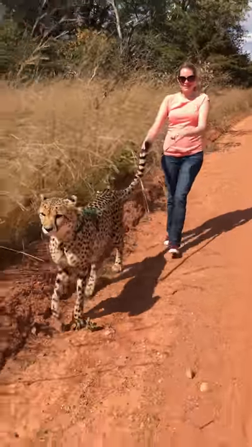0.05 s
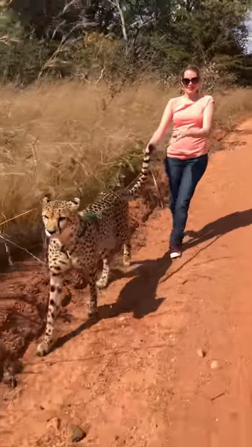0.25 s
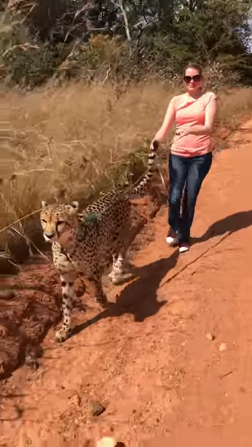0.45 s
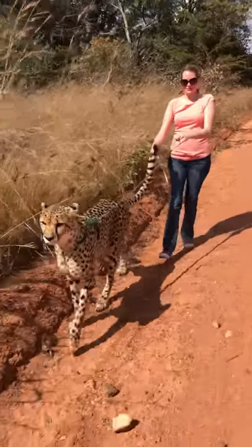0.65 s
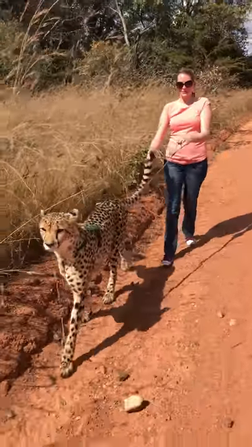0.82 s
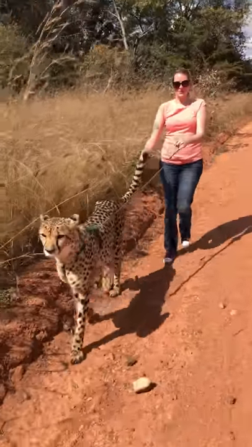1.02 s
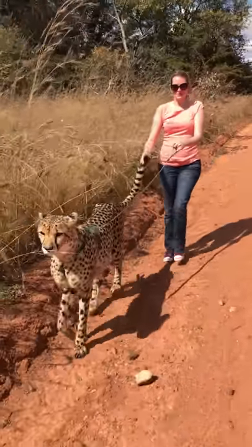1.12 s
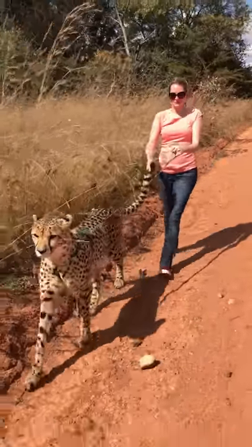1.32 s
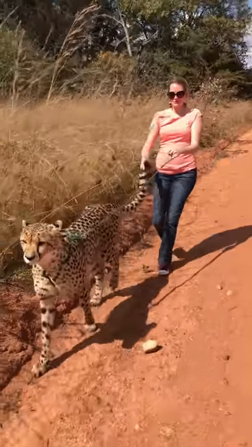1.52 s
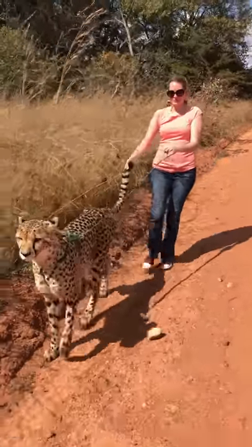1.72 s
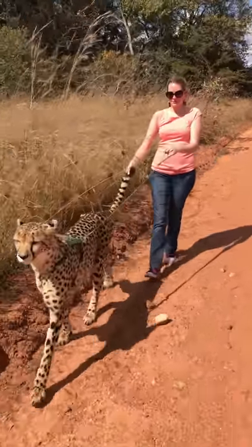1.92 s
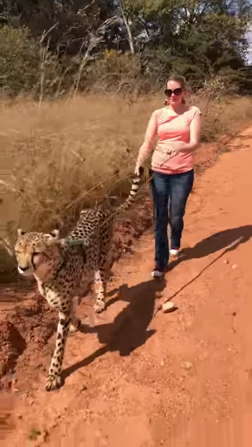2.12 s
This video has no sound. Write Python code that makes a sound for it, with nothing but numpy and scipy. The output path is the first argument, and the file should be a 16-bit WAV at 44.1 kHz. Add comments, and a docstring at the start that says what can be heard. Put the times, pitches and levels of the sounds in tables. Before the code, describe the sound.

Gusts of wind rumble and thump against a microphone carried along a dirt track, strongest in the first second and returning more lightly twice. Soft gritty steps, rustling dry grass and a tiny bird chirp stay far in the background.

```python
"""Wind on the microphone along a dirt track.

Gusts buffet the microphone of a hand-held camera carried along a dry track: each gust is a run
of eddies, single pressure swings, over a low rumble, with a few hard thumps among them.
Behind it soft steps crunch on grit, dry grass swishes and ticks, a small bird chirps faintly
and distant leaves and grass hiss."""
import sys
import numpy as np
from scipy import signal
from scipy.fft import rfft, irfft
from scipy.io import wavfile
from scipy.ndimage import uniform_filter1d

SR = 44100
rng = np.random.default_rng(int(sys.argv[2]) if len(sys.argv) > 2 else 0)


def transcribe(u):
    """Save the signal u as a 16-bit wav file named by the first command-line argument.

    u: samples, shape (n,) or (channels, n), limited to [-1, 1]; the rate is SR.
    q: integer samples, one column per channel.
    """
    v = np.clip(np.atleast_2d(u).T, -1, 1)
    q = np.round(v * 32767).astype(np.int16)
    wavfile.write(sys.argv[1], SR, q)


N = 94815
T = np.arange(N) / SR


def undb(db):
    """The decibel law: 20 dB is a factor of ten in amplitude."""
    return 10 ** (np.asarray(db) / 20)


def unit(x):
    """Normalisation to rms 1."""
    return x / np.sqrt(np.mean(x ** 2) + 1e-20)


def smooth(x, samples):
    """Low-pass filtering by two moving averages in turn."""
    return uniform_filter1d(uniform_filter1d(x, samples), samples)


def colour(x, points):
    """Spectral shaping by (Hz, dB) points, scaled to rms 1."""
    hz, db = np.array(points, float).T
    bins_hz = np.maximum(np.fft.rfftfreq(N, 1 / SR), 1)
    gain = undb(np.interp(np.log(bins_hz), np.log(hz), db))
    return unit(irfft(rfft(x) * gain, N))


def hump(hz, width_oct=1.22):
    """A broad band-pass spectrum around hz, as (Hz, dB) points."""
    octaves = np.linspace(-5, 5, 21)
    offset = (octaves / width_oct) ** 2
    return np.c_[hz * 2 ** octaves, -20 * np.log10(1 + offset + offset ** 2 / 2)]


def curve(points):
    """Gain interpolated between (s, dB) points."""
    return undb(np.interp(T, *np.array(points).T))


def swell(at, rise, decay):
    """An envelope with a Gaussian rise to its peak and an exponential decay."""
    return np.exp(-(np.minimum(T - at, 0) / rise) ** 2 - np.maximum(T - at, 0) / decay)


def eddy(at, hz, steepness, phase):
    """A passing eddy makes one pressure swing, its spectrum peaking at hz and falling steeply above."""
    near = slice(max(int((at - .03) * SR), 0), max(int((at + .03) * SR), 0))
    pulse = (1 - 2j * np.pi * hz * (T[near] - at) / steepness) ** -(steepness + 1)
    out = np.zeros(N)
    out[near] = np.real(np.exp(1j * phase) * pulse)
    return out


def eddies(start, length, hz, per_s, steepness):
    """Turbulence is an irregular run of eddies; the smaller ones are higher and weaker."""
    attack_s, release_s = 0.00512, 0.008
    spread_oct, spread_db = 0.51, 2
    run = np.zeros(N)
    for k, (late, pitch, strength, turn) in enumerate(rng.standard_normal((64, 4))):
        at = start + (k + late / 3) / per_s - attack_s
        if k == 0 or at < start + length + 2 * release_s:
            ratio = 2 ** (spread_oct * np.clip(pitch, -1.5, 1.5))
            envelope = np.exp(min(at - start, 0) / attack_s - max(at - start - length, 0) / release_s)
            gain = envelope * undb(spread_db * strength) / np.sqrt(ratio)
            run += gain * eddy(at, hz * ratio, steepness, np.pi * turn)
    return unit(run) * np.sqrt(length * SR / N)  # about rms 1 while the run lasts


def gusts():
    """Eddy shedding at the microphone: quick, small eddies flutter and slower, large ones boom."""
    # Each row: start in seconds, length in seconds, level of the small eddies in dB,
    # their pitch in Hz, level of the large eddies in dB.
    buffets = [(0.0, 0.038, -43.5, 160, -43), (.14, 0.026, -48.5, 260, -50.5),
               (.23, 0.025, -27, 213, -28.5), (.252, 0.041, -29.5, 234, -27.5),
               (.288, 0.051, -30, 223, -42), (.356, 0.024, -26, 340, -34.5), (.384, 0.031, -26.5, 428, -26),
               (.42, 0.039, -32.5, 179, -29), (.485, 0.11, -35.5, 200, -38), (0.61, 0.033, -22, 366, -19.5),
               (0.653, .022, -21.5, 445, -18.5), (.684, 0.023, -33.5, 185, -34),
               (1.078, 0.0204, -38, 146, -33.5), (1.132, 0.079, -32, 184, -32.5),
               (1.194, 0.032, -27.5, 210, -24), (1.605, 0.014, -46.5, 222, -56),
               (1.89, 0.0099, -32, 150, -36), (1.928, 0.026, -49, 150, -46),
               (2.008, 0.0083, -38.5, 185, -40), (2.078, 0.019, -39, 145, -34)]
    out = np.zeros(N)
    for start, length, small_db, hz, large_db in buffets:
        out += undb(small_db) * eddies(start, length, hz, per_s=280, steepness=3.56)
        out += undb(large_db) * eddies(start, length, hz=150, per_s=130, steepness=3.73)
    return out


def thumps():
    """Impulsive excitation: a hard knock of air or hand on the microphone gives one pressure pulse."""
    # Each row: time in seconds, peak level in dB, pitch in Hz.
    knocks = [(0.253, -17, 270), (0.366, -13, 363), (0.4124, -8, 462), (.449, -27.5, 400),
              (0.536, -21, 290), (.589, -20, 474), (0.6052, -4.5, 435), (0.6122, -10, 158),
              (0.6233, -15.5, 616), (0.6319, -9, 314), (.655, -25, 755), (.669, -12, 330),
              (0.6825, -19, 470), (1.1337, -21, 233), (1.1735, -27.5, 354), (1.1955, -28, 430),
              (1.2195, -20, 297), (1.2248, -17, 233), (1.8868, -16, 227)]
    return sum(undb(db) * eddy(at, hz, steepness=3.8, phase=4.32) for at, db, hz in knocks)


def rumble():
    """Large-scale turbulence: a low rolling that follows the wind and levels off in strong gusts."""
    # Spectrum of the slow eddies. Each row: frequency in Hz, relative level in dB.
    spectrum = [(20, -26), (32, -23.5), (48, 0.5), (62, 0), (80, -1.5), (100, -13), (140, -15),
                (200, -24.5), (300, -41.5), (500, -63), (900, -88)]
    # Strength of the wind. Each row: time in seconds, relative level in dB.
    wind = [(0.0, -49.5), (0.064, -38.5), (0.19, -52.5), (0.25, -29), (0.3, -43), (0.334, -38), (0.37, -38),
            (0.416, -26), (0.486, -34), (0.506, -51), (0.54, -27), (0.57, -39), (0.64, -34), (0.756, -46),
            (0.842, -37), (0.866, -55.5), (0.912, -39.5), (1.056, -43.5), (1.076, -34), (1.182, -28),
            (1.208, -32), (1.238, -28), (1.258, -34.5), (1.282, -45.5), (1.418, -52.5), (1.458, -44),
            (1.538, -57.5), (1.564, -46.5), (1.644, -45), (1.684, -62), (1.728, -44.5), (1.8, -55),
            (1.83, -57), (1.894, -34.5), (1.97, -42), (1.984, -58), (2.026, -52), (2.044, -61),
            (2.058, -45), (2.082, -39), (2.114, -38.5), (2.15, -65)]
    roll = colour(rng.standard_normal(N), spectrum)
    even_roll = roll / np.sqrt(smooth(roll ** 2, 1100))
    strength = curve(wind) * undb(1)
    ceiling = undb(-21.5)
    return even_roll * strength / np.hypot(1, strength / ceiling)


def grit(per_s=5000, spread_db=4):
    """Shot noise: dense, independent clicks of uneven size."""
    clicks = (rng.random(N) < per_s / SR) * rng.choice([-1, 1], N)
    return clicks * undb(spread_db * np.minimum(rng.exponential(size=N), 4))


def steps():
    """Granular noise: soles and paws press grit into a soft crunch over a duller scuff of earth."""
    # Each row: peak time, rise and decay in seconds, level in dB, pitch of the crunch in Hz.
    footfalls = [(.16, .05, 0.12, -59.5, 1670), (.315, 0.054, 0.066, -50.5, 1760),
                 (.85, 0.048, 0.076, -54.5, 2700), (.95, 0.02, .06, -59, 3000),
                 (1.045, 0.048, 0.09, -59, 1130), (1.382, 0.026, 0.023, -50, 2650),
                 (1.48, 0.066, 0.03, -57, 1940), (1.534, 0.03, 0.079, -53.5, 1170),
                 (1.612, 0.011, 0.024, -50.5, 1190), (1.97, 0.095, 0.073, -56.5, 2490),
                 (2.085, 0.045, 0.047, -55.5, 1700)]
    earth = undb(-6.5) * colour(grit(), hump(hz=537))
    out = np.zeros(N)
    for at, rise, decay, db, hz in footfalls:
        crunch = colour(grit(), hump(hz))
        out += undb(db) * swell(at, rise, decay) * (crunch + earth)
    return out


def grass():
    """Stick-slip friction: dry stalks catch and slip in uneven swishes, and some tick."""
    # Each row: peak time, rise and decay in seconds, level in dB, treble tilt in dB per octave.
    swishes = [(.115, 0.02, 0.027, -49, 4), (.395, 0.046, 0.015, -51, 3), (.54, 0.052, 0.18, -57, -0.5),
               (.763, 0.012, 0.011, -43.5, 1.5), (0.786, 0.0087, .016, -45, 0),
               (.87, 0.042, 0.13, -60.5, -4), (1.252, 0.012, 0.04, -53.5, -1.5),
               (1.49, .02, .02, -53.5, -3.5), (1.804, 0.028, 0.012, -50.5, 0.5),
               (2.06, 0.0071, 0.0067, -57, -3)]
    # Each row: time in seconds, level in dB.
    ticks = [(.304, -41), (0.314, -50), (0.344, -38.5), (.411, -42.5), (.459, -45)]
    # Spectra of the two sounds. Each row: frequency in Hz, relative level in dB.
    swish_spectrum = [(3000, 0), (5000, 0), (7500, -1.5), (10000, -2), (13000, 1.5), (17000, 4)]
    tick_spectrum = [(4000, -17), (7000, -10.5), (10000, -9), (12500, -2.5), (17000, 2)]
    catches_per_s, catch_db = 320, 5
    catches = np.interp(T * catches_per_s, np.arange(N), rng.standard_normal(N))
    rubbing = rng.standard_normal(N) * undb(catch_db * catches)
    hz, shape_db = np.array(swish_spectrum, float).T
    brush = np.zeros(N)
    for at, rise, decay, db, tilt in swishes:
        tilted = np.c_[hz, shape_db + tilt * np.log2(hz)]
        brush += undb(db) * swell(at, rise, decay) * colour(rubbing, tilted)
    tick_envelope = sum(undb(db) * swell(at, rise=.002, decay=.004) for at, db in ticks)
    return brush + tick_envelope * colour(grit(), tick_spectrum)


def bird():
    """Frequency modulation: each brief chirp, a tone with its octave, falls and wavers roughly."""
    # Each row: centre time in seconds, pitch in Hz, level in dB.
    chirps = [(1.427, 6800, -55.5), (1.45, 6920, -57), (1.53, 6650, -63), (1.547, 7000, -61)]
    half_width_s, fall_hz_per_s, rough_hz, octave_db = 0.0061, 12000, 380, 3.5
    out = np.zeros(N)
    for at, hz, db in chirps:
        waver = rough_hz * unit(uniform_filter1d(rng.standard_normal(N), size=20))
        phase = 2 * np.pi * np.cumsum(hz - fall_hz_per_s * (T - at) + waver) / SR
        tone = np.sin(phase) + undb(octave_db) * np.sin(2 * phase)
        out += undb(db) * np.exp(-((T - at) / half_width_s) ** 2) * tone
    return out


def grassland(flicker_db=1.42):
    """Incoherent addition: distant leaves and grass merge into a faint, slightly flickering hiss."""
    # Spectrum of the hiss. Each row: frequency in Hz, relative level in dB.
    spectrum = [(100, -0.5), (200, -2.5), (300, -7), (490, -15), (1100, -8), (2000, -14), (4200, -16.5),
                (4900, -20.5), (6100, -18), (7600, -24.5), (8500, -20), (10400, -25.5), (12500, -21),
                (16000, -28), (17500, -24)]
    # Its slow drift. Each row: time in seconds, level in dB.
    drift = [(0, -54), (.4, -54), (.6, -57.5), (.95, -53.5), (1.2, -56.5), (1.6, -55), (2.15, -55.5)]
    flicker = unit(smooth(rng.standard_normal(N), 1200))
    hiss = colour(rng.standard_normal(N), spectrum)
    return hiss * curve(drift) * undb(flicker_db * flicker)


def scene():
    """Superposition in one channel: wind on the microphone in front, the walk behind it."""
    return (gusts() + thumps() + rumble() + steps() + grass() + bird() + grassland())[None]


def record(dry):
    """Band limiting: the camera cuts the deepest bass and the highest treble."""
    low_cut_hz, high_cut_hz = 27.6, 17400
    high_pass = signal.butter(2, low_cut_hz, "high", fs=SR, output="sos")
    low_pass = signal.ellip(10, .2, 70, high_cut_hz, fs=SR, output="sos")
    return signal.sosfilt(low_pass, signal.sosfilt(high_pass, dry))


dry = scene()
out = record(dry)
transcribe(out)
```